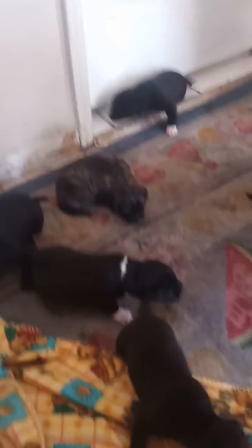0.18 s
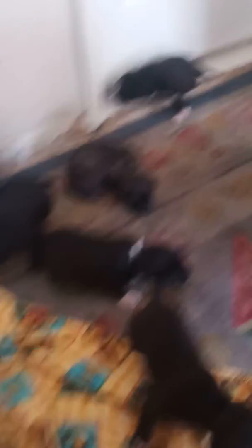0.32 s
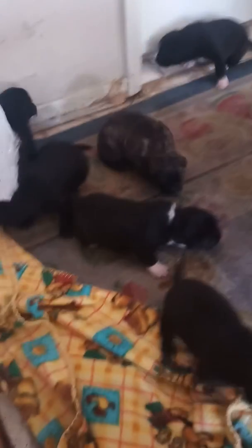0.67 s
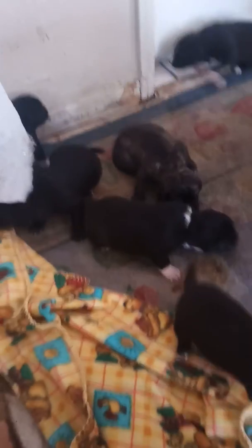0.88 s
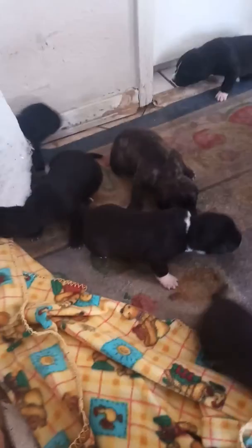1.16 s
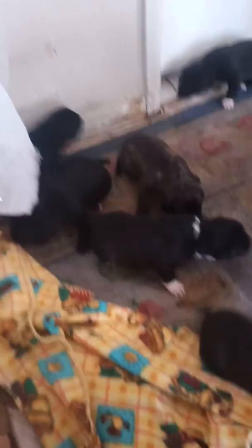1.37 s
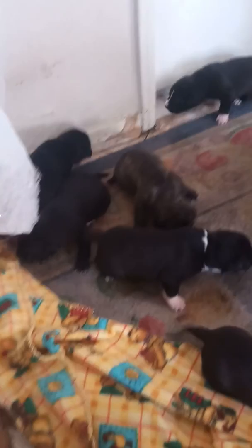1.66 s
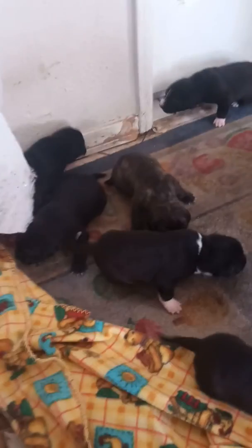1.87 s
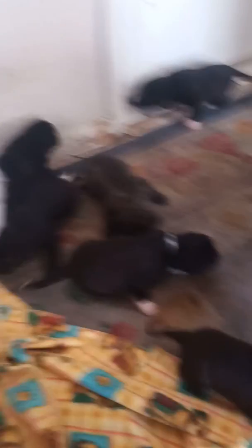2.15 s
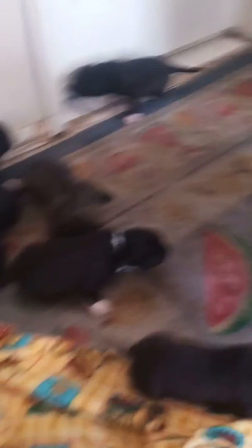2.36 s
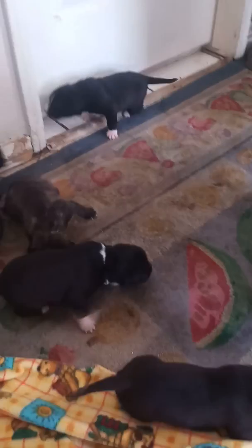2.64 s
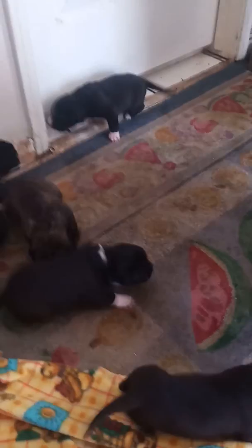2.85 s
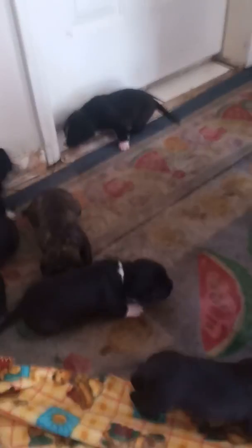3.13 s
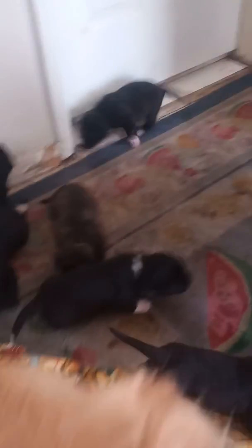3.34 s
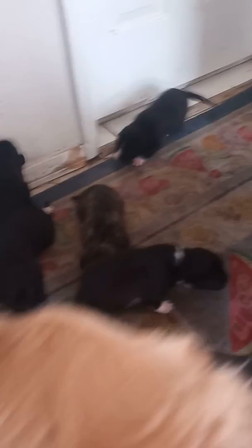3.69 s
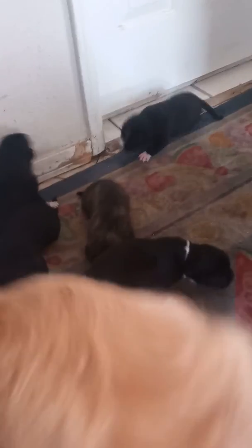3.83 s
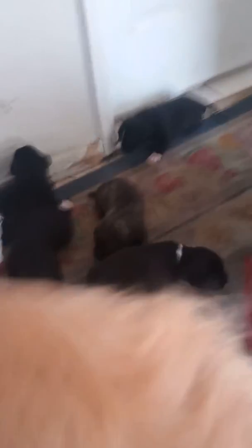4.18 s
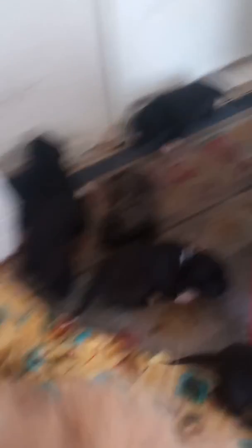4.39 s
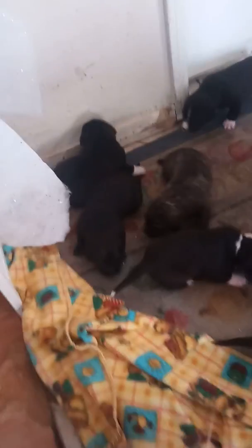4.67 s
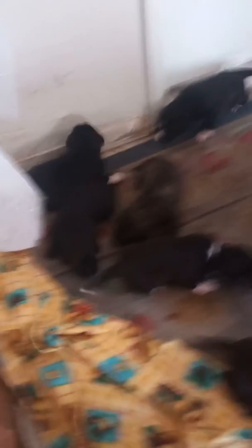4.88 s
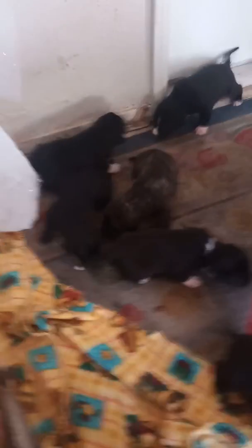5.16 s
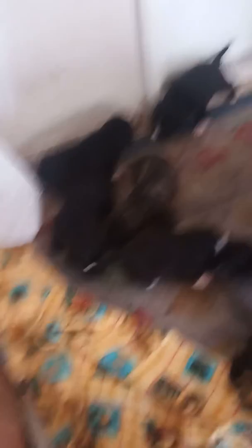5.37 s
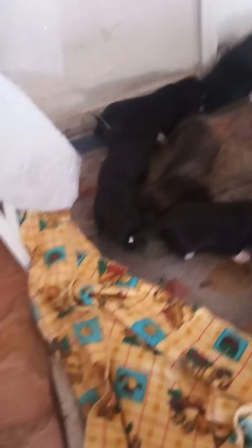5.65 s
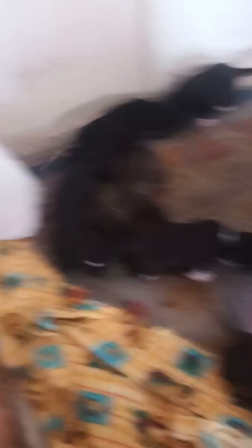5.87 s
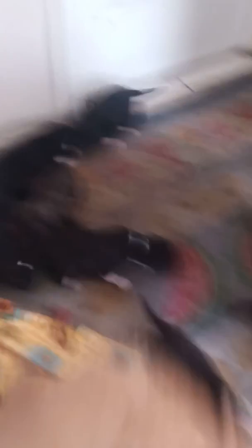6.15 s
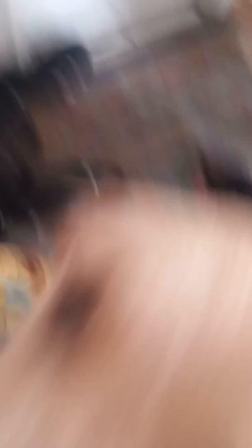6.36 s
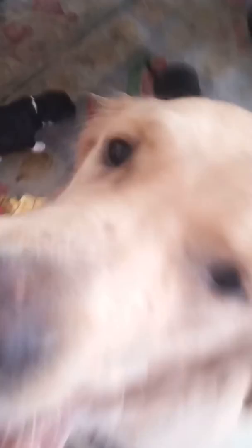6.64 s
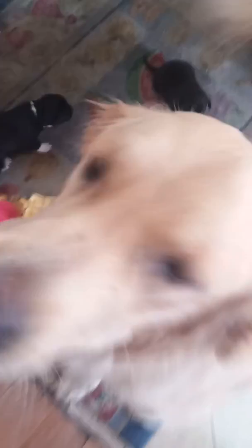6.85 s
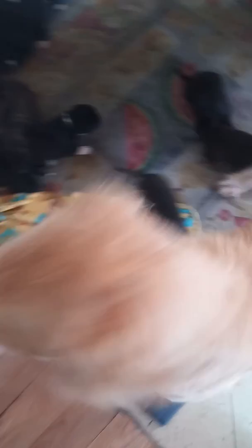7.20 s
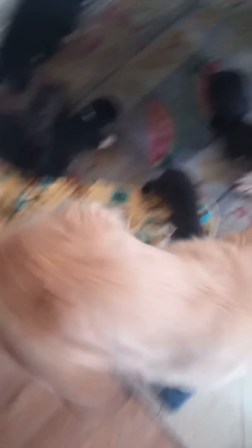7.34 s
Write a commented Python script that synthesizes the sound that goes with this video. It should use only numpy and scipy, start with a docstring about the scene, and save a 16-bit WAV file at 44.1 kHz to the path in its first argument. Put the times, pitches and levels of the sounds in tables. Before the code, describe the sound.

Several small puppies call over one another in a small, hard-walled room: low hoarse grunts, thin rising whines and piercing yelps. A strong wooden knock comes early, with fainter ones later. Around the middle and after, a hand rubs and bumps the microphone. The calls thin to whimpers, then end on one loud, high, clear whine. Quiet hiss lies beneath, and the puppies are a step or two away.

```python
"""A litter of young puppies yelp, whine and grunt over one another in a small, hard-walled room.
Every call is one push of effort: its pitch glides, its level swells and fades, and in a yelp the mouth gapes.
Each voice is a stack of gliding harmonics plus rushing air, coloured by throat and microphone together.
Something knocks on a wooden door, ringing its panel, and a hand shifts on the microphone with rubs and bumps.
Quiet coloured noise lies underneath as room tone and microphone hiss."""
import sys
import numpy as np
from scipy import signal
from scipy.fft import rfft, irfft, next_fast_len
from scipy.io import wavfile
from scipy.ndimage import uniform_filter1d, map_coordinates

SR = 44100
rng = np.random.default_rng(int(sys.argv[2]) if len(sys.argv) > 2 else 0)


def file_out(sig):
    """Save sig as 16-bit WAV at sys.argv[1]."""
    # one column per channel
    cols = np.atleast_2d(sig).T
    # limit, then scale
    lim = np.clip(cols, -1, 1)
    pcm = np.round(lim * 32767).astype(np.int16)
    wavfile.write(sys.argv[1], SR, pcm)


N = 331632  # length of the scene in samples


def amp(db):
    """Turn decibels into a gain."""
    return 10 ** (np.asarray(db) / 20)


def unit(x):
    """Scale a sound to an rms of 1."""
    return x / np.sqrt(np.mean(x ** 2) + 1e-20)


def along(points, hz):
    """Read a curve of (pitch_hz, value) points on a logarithmic pitch axis."""
    point_hz, value = np.transpose(points)
    return np.interp(np.log(hz + 1), np.log(point_hz + 1), value)


def wobble(rate, size):
    """A smooth random curve with `rate` random knots a second."""
    knots = rng.standard_normal(int(size * rate / SR) + 4)
    return map_coordinates(knots, [np.arange(size) * rate / SR])


def filtered(x, gain):
    """Apply a gain that is a function of frequency."""
    m = next_fast_len(len(x) + 8192)
    return irfft(rfft(x, m) * gain(np.fft.rfftfreq(m, 1 / SR)), m)[:len(x)]


def noise(spectrum, size):
    """Noise coloured by (pitch_hz, level_db) points, with an rms of 1."""
    white = rng.standard_normal(size)
    return unit(filtered(white, lambda hz: amp(along(spectrum, hz))))


def add(track, s, sound):
    """Mix a sound into the track at time s."""
    start = max(round(s * SR), 0)
    part = track[start:start + len(sound)]
    part += sound[:len(part)]


# Colour of the room tone and hiss: pitch_hz, level_db (only the shape matters)
ROOM_TONE = [(25, -21), (70, -5), (250, -2), (900, -4), (2000, -13), (3300, -25), (6000, -18), (9000, -31),
             (13500, -32), (15500, -24)]


def room_tone():
    """Quiet room tone and microphone hiss, as steady coloured noise."""
    return amp(-74) * noise(ROOM_TONE, N)


# The hand shifts its grip: middle_s, half_length_s, rumble_db, skin_rub_db
GRIP_SHIFTS = [(0.048, .16, -59, -74), (4.6, .05, -57, -80), (5.01, 0.12, -52.5, -58),
               (5.378, 0.12, -58, -75), (6.025, 0.16, -57, -60)]
# Finger bumps on the microphone body: start_s, thud_db, tick_db
FINGER_BUMPS = [(4.598, -41.5, -56), (5.034, -44, -69), (5.068, -44, -53), (5.9, -68, -46),
                (6.037, -42.5, -77), (7.455, -40.5, -73)]


def handling():
    """Fingers rub and bump the microphone body, making low rumbles and thuds and brighter rubs and ticks."""
    middle, half_length, rumble_db, rub_db = np.transpose(GRIP_SHIFTS)
    # each shift swells and dies away
    grips = np.exp(-((np.arange(N)[:, None] / SR - middle) / half_length) ** 2)
    # noise colours: pitch_hz, level_db
    body = [(25, -50), (70, -8), (115, -9.5), (220, -6.5), (700, -15.5), (3000, -51.5)]
    skin = [(200, 4), (1500, 10.0), (3300, 6.5), (6000, 5.5), (9000, -26.0), (13000, -20.0), (15300, -15.5)]
    track = grips @ amp(rumble_db) * amp(6.2 * wobble(19, N)) * noise(body, N)
    track += grips @ amp(rub_db) * amp(2.6 * wobble(60, N)) * noise(skin, N)
    t = np.arange(SR // 5) / SR
    for s, thud_db, tick_db in FINGER_BUMPS:
        thud = amp(thud_db - 60 * t / 0.085) * noise(body, len(t)) * (1 - np.exp(-t / 0.00038))
        tick = amp(tick_db - 60 * t / 0.055) * noise(skin, len(t))
        add(track, s, thud + tick)
    return track


# Knocks on the door: start_s, level_db, clack_db, heft_db (added to the modes below 200 Hz)
DOOR_KNOCKS = [(.378, -28, -12.5, -1), (1.264, -54.5, 6, -6.5), (1.6, -44, 5, -2), (5.651, -41.5, 0, -13.5),
               (6.273, -33, -7, -12.5), (6.783, -34.5, -7.5, -14.5)]
# Ringing modes of the door panel: pitch_hz, level_db, t60_s (time to fall by 60 dB)
DOOR_MODES = [(106.3, -0.5, 0.13), (161.6, -4.5, 0.11), (202.3, -3.5, 0.019), (239.8, 3.5, 0.12),
              (286, 1, 0.11), (367.6, -14, 0.36), (550, -15, 0.091), (803, -5.5, 0.049)]
# Colour of the door's clack: pitch_hz, level_db (only the shape matters)
CLACK_COLOUR = [(100, -23.5), (700, 9), (1800, -2.5), (2700, -8.5), (3300, -10), (4200, -8.5), (6800, -3.5),
                (8500, -25.5), (15000, -47)]


def knocks():
    """Each blow rings the door panel and makes it clack in its frame; heavy blows reach its lowest modes."""
    track = np.zeros(N)
    t = np.arange(SR // 2) / SR
    for s, level_db, clack_db, heft_db in DOOR_KNOCKS:
        panel = np.zeros(len(t))
        for hz, mode_db, t60 in DOOR_MODES:
            # every blow excites the modes a little differently
            start_db = mode_db + heft_db * (hz < 200) + rng.normal(0, 1.15)
            panel += amp(start_db - 60 * t / t60) * np.sin(2 * np.pi * hz * t)
        clack = amp(clack_db - 60 * t / 0.12) * noise(CLACK_COLOUR, len(t))
        soft_start = 1 - np.exp(-t / 0.0073)
        add(track, s, amp(level_db) * (1.51 * panel + clack) * soft_start)
    return filtered(track, lambda hz: amp(along([(30, -17.0), (90, 4.5)], hz)))


def roughness(spans, base):
    """Share of irregular vibration over time, set anew in the given spans and smoothed at their edges."""
    t = np.arange(N + SR) / SR
    share = np.full(len(t), base)
    for start, end, rough in spans:
        share[(t > start) & (t < end)] = rough
    return np.clip(uniform_filter1d(share, size=400), 0, .95)


# How a nearly shut mouth colours the harmonics: pitch_hz, level_db
SHUT_MOUTH = [(1900, -2), (2600, -12), (3700, -8.5), (5000, -26), (5900, 5), (7000, -9), (8200, -5.5)]


def cry(call, rough, jitter, attack, release, rasp_hz, air_db):
    """One call at the vocal folds: gliding harmonics, coloured by a nearly shut mouth, and a rush of air."""
    s, *columns = np.transpose(call)
    first, last = max(int((s[0] - attack) * SR), 0), int((s[-1] + release) * SR)
    t = np.arange(first, last) / SR
    size = len(t)
    pitch, level, overtones, strain = [np.interp(t, s, c) for c in columns]
    pitch = uniform_filter1d(pitch, size=400) * (1 + jitter * wobble(151.6, size))
    share = np.interp(t, np.arange(len(rough)) / SR, rough)
    # weak, unstrained moments have the mouth nearly shut (1), strong ones have it open (0)
    shut = 1 - np.clip((level + strain + 52) / 14, 0, 1)
    # irregular cycles smear the upper harmonics most
    phase = 2 * np.pi * np.cumsum(pitch * (1 + 0.051 * share * wobble(700, size))) / SR
    voice = np.zeros(size)
    for k in range(1, min(int(13000 / pitch.mean()), 26) + 1):
        hz = k * pitch
        treble = np.interp(hz, [3100, 3500], [0, 1])  # 0 for low overtones, 1 for treble
        db = shut * along(SHUT_MOUTH, hz)
        db = db + (k > 1) * ((1 - treble) * overtones + treble * strain)
        db = db + 3.8 * wobble(43.65, size)  # each harmonic swells and sinks as tongue and jaw move
        steady = np.sin(k * phase)
        scatter = wobble(rasp_hz, size) * steady + wobble(rasp_hz, size) * np.cos(k * phase)
        voice += amp(db) * (np.sqrt(2 * (1 - share)) * steady + np.sqrt(share) * scatter)
    # rough folds beat strong and weak by turns, which adds lines halfway between the harmonics
    voice *= 1 + 0.8 * share * np.cos(phase / 2)
    # turbulence escapes each time the folds open, more of it when they flap irregularly
    low_colour = [(250, -42.5), (700, -20), (2800, 15), (4000, -42.0)]
    high_colour = [(3000, -61.5), (4000, -5.5), (5200, -1), (6000, 8.5), (7500, -11), (11000, 1.5)]
    low_air = amp(np.maximum(overtones, -6)) * noise(low_colour, size)
    high_air = amp(strain) * noise(high_colour, size)
    puffs = 1 + 0.5 * np.cos(phase)
    voice += amp(air_db) * np.sqrt(share) * (low_air + 2.7 * high_air) * puffs
    fade_in = np.clip((t - s[0] + attack) / attack, 0, 1)
    fade_out = np.clip((s[-1] + release - t) / release, 0, 1)
    return t[0], voice * amp(level) * (fade_in * fade_out) ** 2


# Colour of the puppies' throats together with the microphone: pitch_hz, level_db
VOICE_COLOUR = [(200, 8), (400, 5), (900, 6), (1400, -3), (2000, -4.5), (2700, -10.5), (3080, -21.5),
                (3480, -19.5), (3900, -13), (5000, 1.5), (5600, -11), (6800, -5), (8100, -21.5),
                (9000, -33.5)]


def puppies(calls, rough, jitter, attack, release, rasp_hz, air_db):
    """All calls of one kind, through one shared colouring of throat and microphone, dull in the highest treble."""
    track = np.zeros(N)
    for call in calls:
        add(track, *cry(call, rough, jitter, attack, release, rasp_hz, air_db))

    def colouring(hz):
        """The shared colour, with a further steep fall of 64 dB an octave above 10 kHz."""
        return amp(along(VOICE_COLOUR, hz) - 64 * np.log2(np.maximum(hz / 10000, 1)))
    return filtered(track, colouring)


def glide(row, onset_db, fade_db):
    """One push of breath: pitch eases to its last value while the level swells and fades."""
    start, length, first_hz, last_hz, glide_s, swell_s, level, overtones, strain = row
    t = np.linspace(0, length, 64)
    ease = 1 - np.exp(-t / glide_s)
    pitch = first_hz + (last_hz - first_hz) * ease / ease[-1]
    effort = np.interp(t, [0, min(swell_s, length), length], [-onset_db, 0, -fade_db])
    # columns: time_s, pitch_hz, level_db, low_overtones_db, treble_strain_db
    return np.column_stack(np.broadcast_arrays(start + t, pitch, level + effort, overtones, strain))


def grunt(row):
    """All grunts share one glide time and one shape of swell, cresting a third of the way in."""
    start, length, first_hz, last_hz, *levels = row
    glide_s, swell_s = .08, 0.33 * length
    return glide((start, length, first_hz, last_hz, glide_s, swell_s, *levels), onset_db=6.5, fade_db=5.5)


# Low, hoarse mutters, with levels before colouring and mix:
# start_s, length_s, first_hz, last_hz, level_db, low_overtones_db, treble_strain_db
GRUNT_CALLS = [ (0.021, 0.14, 567, 700.3, -45, -3, -7), (0.339, 0.024, 325, 322, -57, -11, -13),
               (0.837, 0.041, 331, 239, -54, -16, -16), (1.244, 0.039, 399, 316, -56, -11, -25),
               (1.328, 0.09, 494, 596.6, -51, 2.5, -5), (1.972, 0.088, 412.4, 496, -59, 7.5, -8),
               (2.643, 0.093, 491, 600, -51, 10, -6), (2.866, 0.087, 558.5, 589, -52.5, 9.5, -11.5),
               (2.927, 0.13, 365.6, 364.4, -50.5, 0, -8), (3.083, 0.049, 326, 265.5, -54, -2.5, -10),
               (3.209, 0.081, 499, 554, -58.5, 3, -1), (3.364, 0.04, 386, 288.5, -48.5, -9.5, -32),
               (3.867, .14, 433, 330.2, -49, -6, -11.5), (4.426, 0.18, 325.3, 502.4, -51, -3, -11),
               (4.686, .12, 421, 459.4, -44.5, -4.5, -9), (5.153, 0.07, 407, 433, -51.5, -2.5, -7),
               (5.357, 0.13, 456, 528, -50, 1.5, -12), (5.606, 0.11, 386.8, 444.3, -50.5, 6, -9.5),
               (5.805, 0.088, 379.3, 424.4, -52, 0.5, -22), (5.881, 0.078, 505, 555.6, -54.5, 8.5, -5),
               (6.013, .1, 388, 459, -54.5, 3, -2.5), (6.172, 0.086, 561, 543, -51.5, -0.5, 1),
               (6.487, 0.033, 388, 431, -60, 10.5, -6), (6.612, 0.09, 277.3, 266.7, -58, 6, -0.5),
               (6.853, 0.11, 375.4, 419.5, -58, 7.5, -1), ]
# Where a grunt turns into a growl: start_s, end_s, roughness (0-1)
GROWL_SPANS = [(.02, .17, 0.73), (1.36, 1.43, 0.54), (2.66, 2.75, 0.62), (2.95, 3.04, 0.58),
               (3.87, 3.95, 0.55), (5.62, 5.72, 0.81), (6.61, 6.73, 0.8)]


def grunts():
    """Low calls from irregularly beating folds, hoarser than the other voices and rough in the growls."""
    return puppies(map(grunt, GRUNT_CALLS), roughness(GROWL_SPANS, base=0.075), jitter=0.018,
                   attack=.008, release=0.013, rasp_hz=168.7, air_db=-15.0)


def whine(row):
    """A whine glides and swells at its own pace."""
    return glide(row, onset_db=17, fade_db=8)


# Thin, clear glides, with levels before colouring and mix:
# start_s, length_s, first_hz, last_hz, glide_s, swell_s, level_db, low_overtones_db, treble_strain_db
WHINE_CALLS = [ (1.142, 0.053, 896, 1029, 0.23, 0.027, -46.5, -4, -12),
               (1.57, 0.046, 754, 929, 0.025, 0.022, -43.5, -5, -22),
               (2.211, 0.03, 567, 870, 0.024, 0.027, -41, 2, -13),
               (2.43, 0.047, 502, 724, .05, .045, -44.5, 4, -7),
               (2.665, 0.058, 598, 869, 0.034, 0.021, -50, 9.5, 5),
               (2.92, 0.031, 688, 859, 0.013, 0.015, -44, 3, -25),
               (3.126, .11, 534.4, 1097, .25, 0.073, -39.5, 0.5, -9.5),
               (3.397, 0.18, 1139, 1622, 0.042, 0.078, -37.5, -4, -9),
               (3.733, 0.067, 1002, 946, 0.033, 0.039, -41.5, -1.5, -3.5),
               (5.811, .08, 780, 1108, 0.12, .06, -50, 1, -20),
               (6.067, 0.12, 1142, 1477, 0.035, 0.087, -43, 5, -5),
               (6.395, .23, 758, 1345, .055, .15, -50, 10, -8),
               (6.701, 0.057, 1004, 1280, 0.16, 0.071, -48, -1, -7),
               (6.774, .12, 1263, 1370, 0.0386, 0.03, -41, 18, -1.5),
               (7.023, 0.19, 1183, 1551, 0.056, 0.053, -28, 0, -9.5),
               (7.068, 0.11, 764, 1450, 0.21, 0.047, -42, 0.5, -31),
               (7.374, 0.39, 1648, 2077, 0.021, 0.057, -19.5, -15, -14),
               (7.421, 0.071, 1188, 1430, 0.078, 0.067, -34, 6, -6.5), ]


def whines():
    """Clear calls from folds that vibrate almost regularly."""
    return puppies(map(whine, WHINE_CALLS), roughness([], base=0.0066), jitter=0.0071,
                   attack=.008, release=.012, rasp_hz=300, air_db=-7)


def yelp(contour, row):
    """Effort builds until the mouth gapes: the cry turns piercing, then darkens from the top as it closes."""
    opens, length, swell_s, level, fade_db, overtones, strain, *gape_levels = row
    gape_db, gape_overtones_db, gape_strain_db = gape_levels
    s, hz = np.transpose(contour)
    t = np.linspace(s[0], s[-1], 128)
    swell = np.interp(t - s[0], [0, swell_s], [-11, 0])
    fade = np.interp(t, [opens, s[-1]], [0, -fade_db])

    def gape(hold):
        """The mouth snaps open in 22 ms, holds, and closes a little more slowly, in 27 ms."""
        return np.interp(t - opens, [-0.022, 0, hold, hold + 0.027], [0, 1, 1, 0])
    lift = gape_db * gape(length)
    # the low overtones stay strong 31 ms longer than the treble
    overtone_lift = gape_overtones_db * gape(length + 0.031)
    strain_lift = gape_strain_db * gape(length)
    # overtones and strain count from the level, so its lift is taken off them again
    return np.column_stack([t, np.interp(t, s, hz), level + swell + fade + lift,
                            overtones + overtone_lift - lift, strain + strain_lift - lift])


# Effort of each yelp, in the order of YELP_CONTOURS, with levels before colouring and mix:
# gape_opens_s, gape_length_s, swell_s, level_db, fade_by_end_db, low_overtones_db, treble_strain_db,
# then what the gape adds: fundamental_db, low_overtones_db, treble_db
YELP_EFFORTS = [ (0.514, 0.016, 0.016, -38, 13, 1.5, -1.5, -6, 12.5, 9.5),
                (.995, 0.057, .055, -44.5, 1.5, 7.5, -5, 1, 9, 8),
                (1.671, 0.021, 0.005, -42.5, 3.5, 5.5, -2, 10, 13.5, 12.5),
                (2.125, .04, 0.059, -32, 1, -6.5, -8.5, -1, 12, 11),
                (3.536, 0.0086, 0.11, -41.5, 4, -5, -4, 0.5, 24, 6.5),
                (3.784, 0.039, 0.032, -34.5, 1.5, 4, -10.5, 1.5, 1.5, 11.5),
                (4.115, 0.065, 0.041, -40, 8, 1, -10, -6, 10.5, 23.5),
                (5.043, .045, 0.083, -39, 10, -1, -11, -11.5, 15, 9),
                (5.235, .045, 0.027, -43, 9, 5.5, -4.5, 15.5, 19, 15), ]
# Pitch path of each yelp, one list of points a yelp: time_s, pitch_hz
YELP_CONTOURS = [
    [(0.44, 813), (0.484, 1353), (0.508, 1346), (0.542, 1208), (0.592, 1169), (0.614, 1107), (0.654, 909),
     (0.712, 829.5), (0.78, 865)],
    [(0.945, 697), (0.973, 816), (0.983, 943), (1.001, 1073), (1.069, 1002), (1.079, 1009), (1.101, 1002),
     (1.113, 912), (1.125, 887)],
    [(1.65, 1330), (1.67, 1415), (1.7, 1262), (1.774, 1254), (1.782, 1188), (1.798, 986), (1.82, 865),
     (1.84, 838), (1.855, 784)],
    [(2.075, 840), (2.107, 1255), (2.123, 1395), (2.163, 1274), (2.201, 1345), (2.283, 1347), (2.309, 1418),
     (2.365, 1376), (2.44, 1254)],
    [(3.38, 864.5), (3.4, 858), (3.434, 930), (3.488, 1307), (3.562, 1342), (3.578, 1134), (3.602, 690),
     (3.61, 668), (3.64, 653)],
    [(3.725, 885.5), (3.741, 1047), (3.767, 1216), (3.795, 1348), (3.805, 1425), (3.815, 1446),
     (3.881, 1475), (3.893, 1454), (3.91, 1456)],
    [(4.03, 777.5), (4.088, 843), (4.11, 967), (4.154, 992), (4.186, 940), (4.234, 919), (4.254, 781),
     (4.268, 742), (4.3, 671)],
    [(4.925, 995), (4.931, 995), (4.949, 913), (4.993, 874.4), (5.033, 863.8), (5.085, 874), (5.099, 849),
     (5.109, 815), (5.125, 714)],
    [(5.155, 834), (5.167, 889.2), (5.197, 1300), (5.219, 1399), (5.259, 1345), (5.285, 1245),
     (5.291, 1180), (5.307, 834.9), (5.32, 850)],
]
# Where a yelping voice cracks: start_s, end_s, roughness (0-1)
CRACK_SPANS = [(.52, .565, .28), (.93, .972, 0.89), (1.664, 1.688, 0.5), (2.121, 2.155, 0.08),
               (3.565, 3.6, 0.37), (3.795, 3.82, 0.54), (4.15, 4.2, 0.62), (4.2, 4.3, 0.12),
               (5.228, 5.255, 0.33), (5.285, 5.31, 0.42)]


def yelps():
    """Cries with gliding pitch and a gaping mouth; the folds vibrate irregularly where the voice cracks."""
    return puppies(map(yelp, YELP_CONTOURS, YELP_EFFORTS), roughness(CRACK_SPANS, base=.025), jitter=0.00932,
                   attack=0.0065, release=0.008, rasp_hz=524.3, air_db=-12)


# How long the room rings: pitch_hz, t60_s (time to fall by 60 dB)
ROOM_DECAY = [(100, 0.34), (400, 0.52), (1500, 0.48), (6000, 0.42), (12000, 0.27)]


def room(x, early_db, tail_db=-6):
    """Floor and near walls answer at once, then a diffuse tail dies away."""
    hz, t, z = signal.stft(rng.standard_normal(SR * 3 // 4), SR, nperseg=256)
    decay = amp(-60 * t / along(ROOM_DECAY, hz)[:, None])
    tail = signal.istft(z * decay, SR, nperseg=256)[1]
    tail *= 1 - np.exp(-np.arange(len(tail)) / SR / 0.017)  # the tail builds up gradually
    response = amp(tail_db) * tail / np.linalg.norm(tail)
    walls = (rng.uniform(.002, .022, size=8) * SR).astype(int)
    response[walls] += amp(early_db) * rng.standard_normal(size=8) / np.sqrt(8)
    response[0] += 1  # the direct sound
    return signal.fftconvolve(x, response)[:N]


def scene():
    """The puppies are a step or two away, so their direct sound stands above the room's tail."""
    mix = room_tone() + handling()
    mix += amp(-1) * room(knocks(), early_db=-17.5)
    mix += amp(-3.0) * room(grunts(), early_db=-6.5)
    mix += amp(-1) * room(whines(), early_db=-2.5)
    mix += amp(-3.0) * room(yelps(), early_db=-6.0)
    return mix[None]


def record(dry):
    """The recorder keeps nothing above its band limit of 15720 Hz."""
    return filtered(dry[0], lambda hz: hz < 15720)[None]


dry = scene()
out = record(dry)
file_out(out)
```